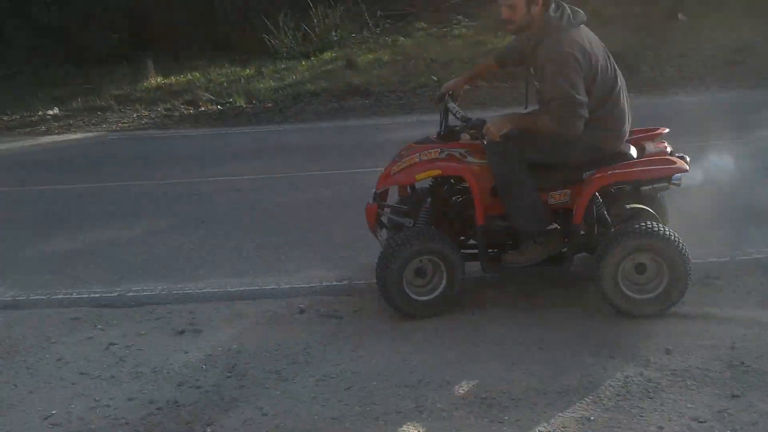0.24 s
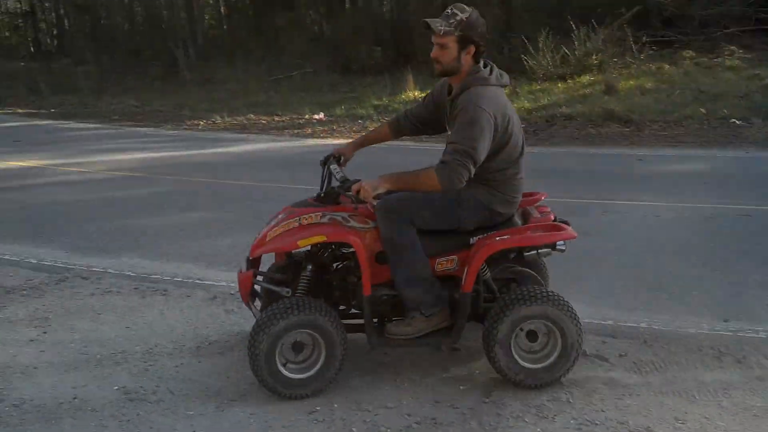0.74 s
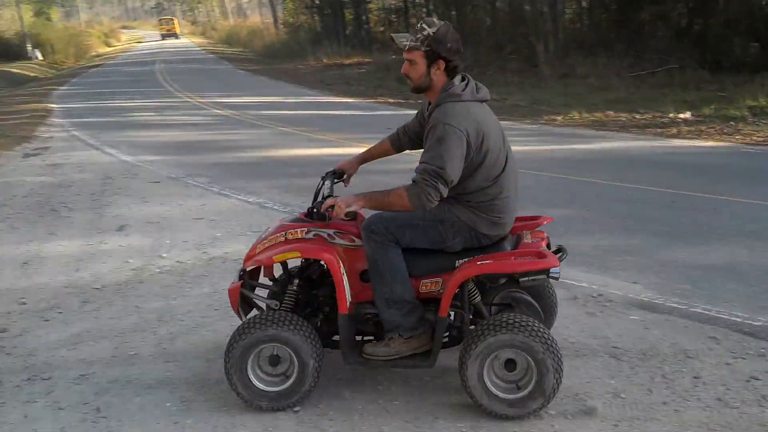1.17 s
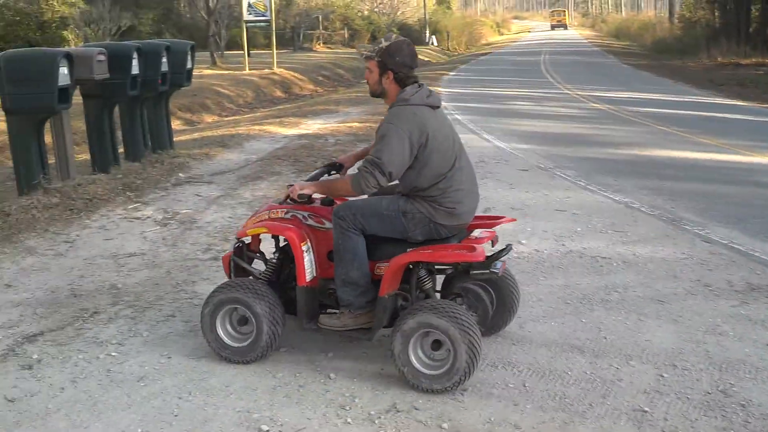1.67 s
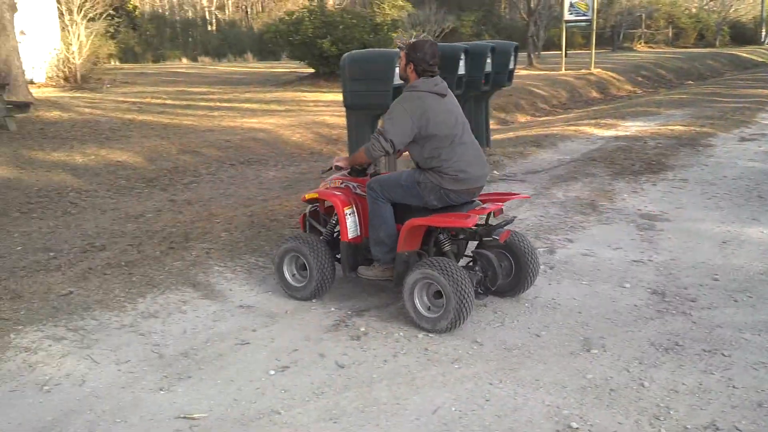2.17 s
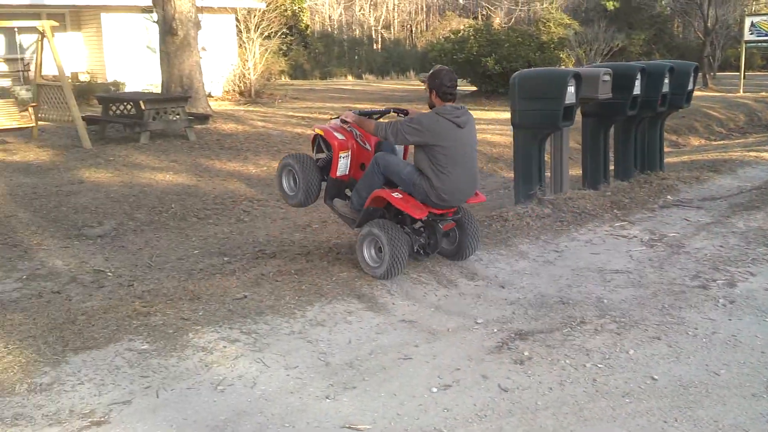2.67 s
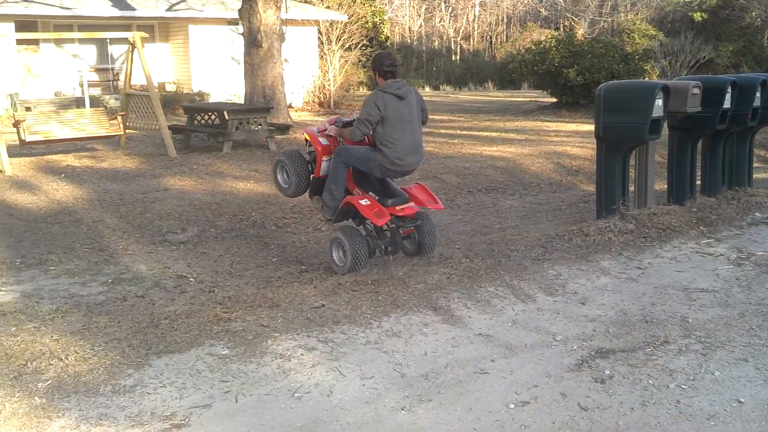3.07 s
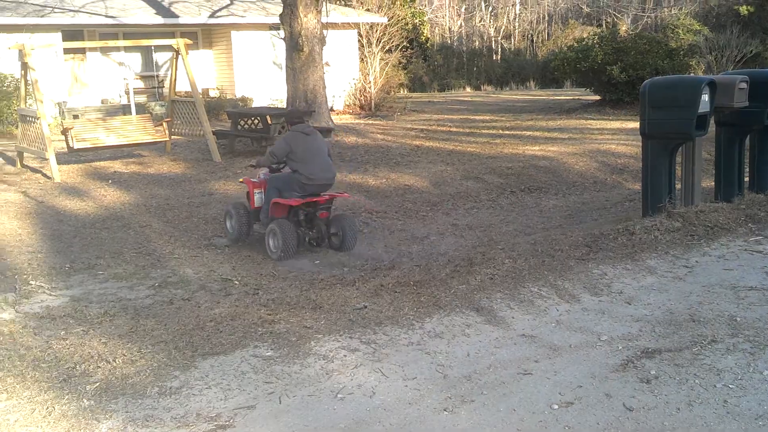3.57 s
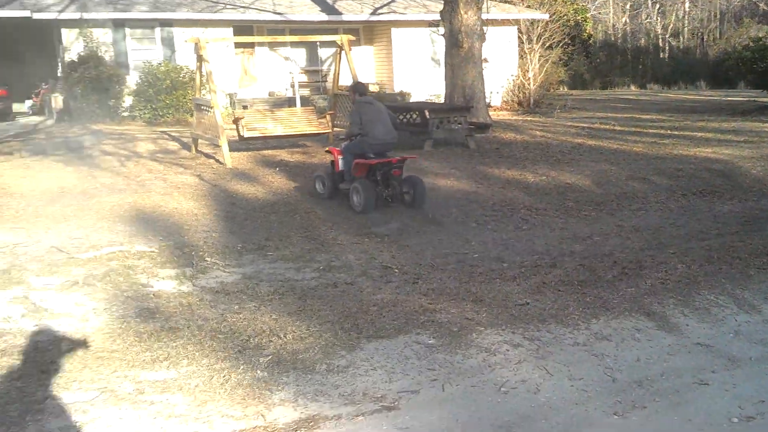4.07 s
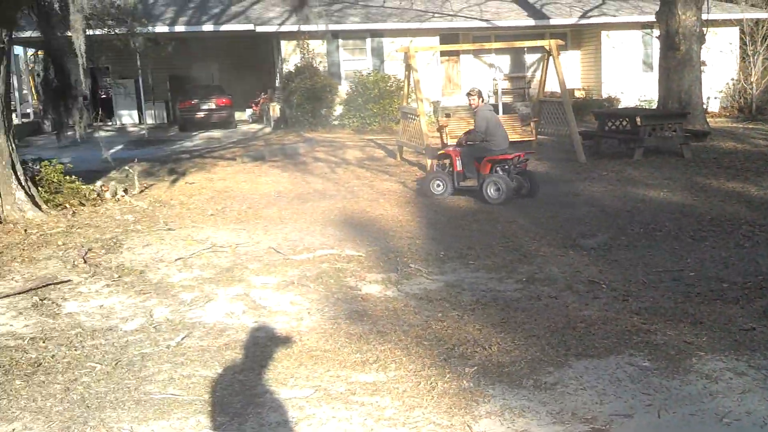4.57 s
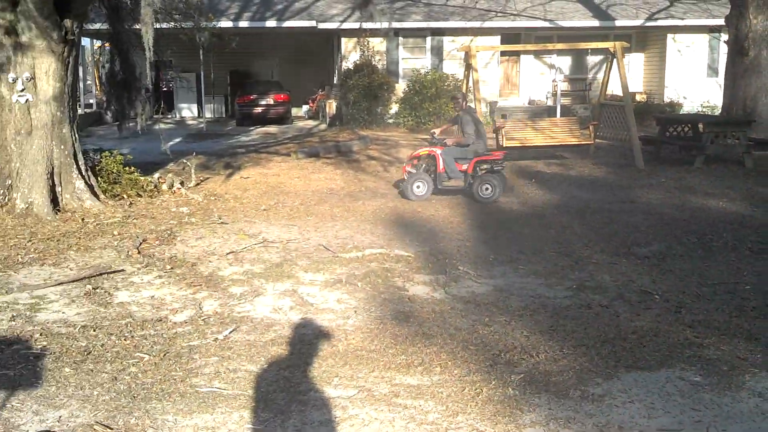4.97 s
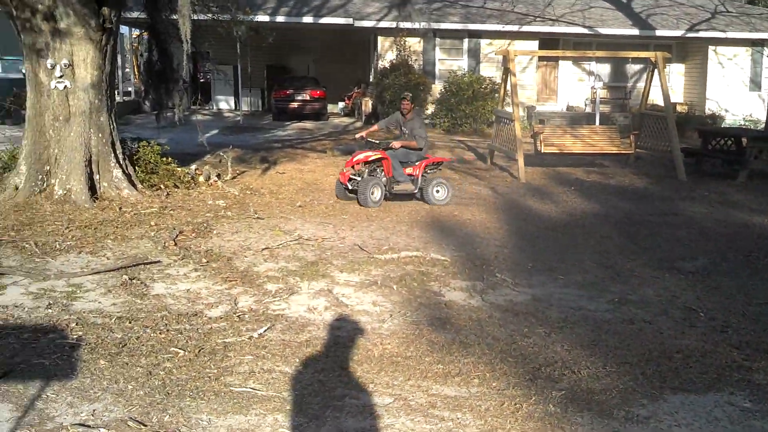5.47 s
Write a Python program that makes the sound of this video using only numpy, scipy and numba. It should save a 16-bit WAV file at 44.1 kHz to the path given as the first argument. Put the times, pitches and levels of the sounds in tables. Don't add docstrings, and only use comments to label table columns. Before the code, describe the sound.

Raspy little quad engine buzzes, sputters unevenly off throttle, and surges through repeated short pulls while gravel and chain rattle.

```python
import sys
import numpy as np
from scipy import signal
from scipy.fft import rfft, irfft, next_fast_len
from scipy.io import wavfile
from scipy.ndimage import uniform_filter1d
from numba import njit

SR = 44100
rng = np.random.default_rng(int(sys.argv[2]) if len(sys.argv) > 2 else 0)


def gain_from_db(level_db):
    decades = np.asarray(level_db, float) / 20
    return 10 ** decades


def materialize(psi):
    bounded = np.clip(np.atleast_2d(psi).T, -1, 1)
    quanta = np.round(bounded * 32767).astype(np.int16)
    wavfile.write(sys.argv[1], SR, quanta)


N = 253134
TIME = np.arange(N) / SR

# start in seconds, end in seconds.
THROTTLE_OPEN = [
    (0, .86),
    (2.1452, 2.77),
    (3.051, 3.62),
    (4.7463, 5.245),
    (5.3323, 5.8),
]
# time in seconds, distance loss in dB, heading in degrees from nose-on,
# load 0-1, nearness 0-1.
RIDE_PATH = [(0.0, 1, 69, 0.69, 1.07), (0.4, 0.3, 72.5, 0.74, 0.86), (0.8, 0, 56, 1.05, 1),
             (1.05, 2.5, 99, 0.51, 1), (1.45, 2, 109, 0.48, 0.92), (1.85, 3.5, 96, 0.1, 0.56),
             (2.07, 2.5, 128, 0, 0.32), (2.27, -1.5, 171, 0.39, 0.87), (2.55, -3, 197, 1.14, 0.51),
             (2.87, -2.5, 130, 0.31, 0.38), (3.1, -3, 139, 0.35, 0.01), (3.5, -6.5, 183, 1.18, 0.28),
             (3.85, -1, 173, 0.82, 0.2), (4.3, -3.5, 128, 0.14, 0.15), (4.7, -4.5, 84, 0.36, 0),
             (4.95, -3.5, 81, 0.72, 0.19), (5.3, -4, 63, 0.7, 0.64), (5.74, -8, 32, 0.88, 0.32)]


def unit(x):
    return x / np.sqrt(np.mean(x ** 2))


def curves(table):
    s, *columns = np.transpose(table)
    return [np.interp(TIME, s, c) for c in columns]


def ride(rules):
    loss_db, heading, load, near = curves(RIDE_PATH)
    angle = np.radians(heading)
    return np.array(rules) @ [1 + 0 * TIME, np.cos(angle), np.sin(angle), load, near], loss_db


@njit
def svf(x, hz, width):
    y = np.empty(len(x))
    band, low, last, g, k = 0., 0., 0., 0., 0.
    for i in range(len(x)):
        if hz[i] != last:
            last = hz[i]
            g = np.tan(np.pi * hz[i] / SR)
            k = width / hz[i]
        v = (band + g * (x[i] - low)) / (1 + g * (g + k))
        band = 2 * v - band
        low = low + 2 * g * v
        y[i] = k * v
    return y


def steep_band(x, hz, width):
    centre = hz + 0 * TIME
    return svf(svf(x, centre, 1. * width), centre, 1. * width)


def ring(x, modes):
    return sum((-1) ** k * gain_from_db(db) * steep_band(x, hz, width) for k, (hz, width, db) in enumerate(modes))


def colour(x, points):
    hz, db = np.transpose(points)
    f = np.fft.rfftfreq(N, 1 / SR) + 1
    return irfft(rfft(x) * gain_from_db(np.interp(np.log(f), np.log(hz), db)), N)


def clicks(at, size):
    place = at.astype(int)[:, None] + np.arange(-8, 9)
    gap = place - at[:, None]
    pulse = np.sinc(gap) * np.cos(np.pi * gap / 18) ** 2
    out = np.zeros(N)
    np.add.at(out, np.clip(place, 0, N - 1), size[:, None] * pulse)
    return out


def speed(sag_s=0.3):
    # time in seconds, turns in Hz.
    pulls = [
        [(0.0, 100.9), (0.176, 101.5), (0.254, 102.6), (0.412, 102.9), (0.528, 101.6), (0.614, 102.9),
         (0.836, 109.7), (0.86, 109.7)],
        [(2.145, 84.27), (2.246, 92.4), (2.38, 104.8), (2.45, 109.5), (2.48, 109.7), (2.688, 105),
         (2.744, 104.8), (2.77, 104)],
        [(3.05, 89.25), (3.098, 91.2), (3.182, 98.5), (3.306, 104.7), (3.49, 107.9), (3.546, 106.6),
         (3.62, 106.4)],
        [(4.745, 83.8), (4.831, 88.25), (4.959, 94.4), (5.161, 99.7), (5.187, 99.1), (5.245, 95.4)],
        [(5.33, 94.4), (5.412, 98.74), (5.516, 101.4), (5.596, 99.6), (5.702, 94), (5.74, 90)],
    ]
    hz = curves(np.vstack(pulls))[0]
    for (_, shut), (opens, _) in zip(THROTTLE_OPEN, THROTTLE_OPEN[1:]):
        coast = (TIME > shut) & (TIME < opens)
        left = np.exp(-(TIME[coast] - shut) / sag_s)
        start, end = hz[coast][[0, -1]]
        sag = end + (start - end) * (left - left[-1]) / (1 - left[-1])
        hz = np.where(coast, np.interp(TIME, TIME[coast], sag), hz)
    return uniform_filter1d(hz, size=2000)


def crank(miss_db=-7.0, fade_s=0.028, before_db=-7, first_db=-1.5, fourth_db=-1.5):
    # time in seconds, turn before in dB, first turn in dB,
    # second over first in dB, third turn in dB.
    shut_catches = [(0.9262, -11.5, -1, 1, .5), (1.0142, -3.5, .5, -0.5, -1), (1.109, -4, 0, -0.5, -9.5),
                    (1.1921, -3.5, 0, -2.5, -5), (1.2669, -8, -1, 1, -3.5), (1.3428, 2, 0, -2, -17),
                    (1.4307, -1, -0.5, 0, -15), (1.52, 5, 0, -.5, -11), (1.6216, 0, -0.5, -1, -9),
                    (1.7246, -3, -1, -1.5, -8), (1.8164, 4, 0, 0, -4), (1.9089, -4, -1.5, 1.5, -13.5),
                    (1.9911, -7, -1, 0.5, -2.5), (2.0738, -5, -.5, -0.5, -10), (2.8114, -5.5, 0.5, 1, 0),
                    (2.8922, -6.5, 0, 1, -0.5), (2.975, -7, 0, -0.5, -8), (3.684, -3.5, -0.5, 0.5, -.5),
                    (3.7807, -7.5, -0.5, 0.5, -2.5), (3.8609, -7, -3, 1.5, -3.5),
                    (3.944, -2, -0.5, -2.5, -7.5), (4.009, -13.5, -1, 0.5, -3),
                    (4.1083, -10.5, 0, 0.5, -4.5), (4.2096, -4.5, -0.5, 1, -5.5), (4.3014, 3.5, 0.5, 0, -5),
                    (4.3936, -2, 0, 1, -10), (4.4864, -5.5, 0, 0, -6), (4.5803, -7, 0, 0.5, -10.5),
                    (4.6749, -4.5, 0.5, -2, -15.5), (5.2797, -17, 0, 0, -0.5)]
    pull_catches = [(start, before_db, first_db, -first_db, 0) for start, _ in THROTTLE_OPEN[1:]]
    catch = np.array(sorted([tuple(row) for row in shut_catches] + pull_catches))

    turns = np.cumsum(speed()) / SR
    at_catch = np.interp(catch[:, 0], TIME, turns)
    whole = np.cumsum(np.round(np.diff(at_catch, prepend=0)))
    turns = turns + np.interp(TIME, np.r_[0, catch[:, 0]], np.r_[0, whole - at_catch])
    s = np.interp(np.arange(int(turns[-1])), turns, TIME)

    held = np.max([(s > a) * np.clip(1 + (b - s) / fade_s, 0, 1) for a, b in THROTTLE_OPEN], axis=0)
    db = miss_db * (1 - held)
    _, before, first, second, third = catch.T
    fourth = np.maximum(third + fourth_db, miss_db) * (third != 0)
    burn = [np.minimum(before, -3.2), first, first + second, third, fourth]
    db[whole.astype(int)[:, None] + np.arange(5) - 1] = np.transpose(burn)
    return turns, s, np.minimum(db, 2.5)


def engine(turns, s, db, puff=.6, lead_db=-4, churn=.6):
    # centre in Hz, width in Hz, level in dB.
    can, rasp, high_rasp = [(1563, 72, 0)], [(2950, 160, -17), (3222, 180, -1.5), (3430, 190, -2.5)], [(3657, 180, 5), (3956, 98, -5), (4376, 81, -4.5)]
    jet = [(4850, 220, -2), (5450, 260, 2), (6700, 500, 0), (7450, 350, -6)]
    # centre in Hz, width in Hz, level in dB.
    neck = [(1853, 147, 0.98), (2417, 950, 3.6)]
    # level in dB, then dB gained nose-on, side-on, under load, near.
    facing = [
        (-26, -5, -5, -5.5, -4.5),
        (-30.5, -3, -2, -1.5, 0),
        (-34, -1.5, -1.5, 6.5, -13.5),
        (-41, -2.5, -8, 8, -4),
        (-17.5, 2.5, -5, -4, -0.5),
        (-9, 5, -5, 1, -11.5),
        (-41.5, -7.5, 19.5, 14, 0.5),
        (-24, -0.15, -1.6, -7.5, 8),
        (-29.5, -1, -4, -0.5, 0),
    ]
    # pitch in Hz, then Hz shifted nose-on, side-on, under load, near.
    drift = [
        (154, 24, 19, -47, -8),
        (366, 21.5, -39.5, 39.5, -81),
        (613, -20, -15, 120, 12),
        (1089, 20, -1, 88.5, -73),
    ]
    # time in seconds, swing -1 to 1.
    outlet_swing = [(0, 0.31), (.5, 0.17), (1, 0.47), (1.6, 0.44), (2.1, 0.37), (2.35, 0.25), (2.7, 0.61),
                    (3.1, 0.2), (3.5, 0.15), (4, 0.37), (4.5, 0.22), (4.75, 0.78), (5.15, 0.74),
                    (5.35, 0.41), (5.55, 0.43), (5.74, -0.21)]
    swing_db = [-4.5, -3, -6.5, -9.5, 4.5, 0, -12, -1, -0.5]
    swing_hz = [3, 244, 8.8, 11]

    jitter_s, scatter_db = .00001, .7
    chance = rng.standard_normal((700, 5))[:len(s)]
    uneven = np.clip(1 - (db + 3) / 3.5, 1, 2.5)
    far = np.clip(1.2 - 1.5 * curves(RIDE_PATH)[3], 0, 1)
    strike = unit(clicks((s + jitter_s * uneven ** 3 * chance[:, 0]) * SR, np.ones(len(s))))
    gas = unit(np.exp(-(turns % 1) / puff) * rng.standard_normal(N))
    turn = np.clip((turns + .1).astype(int), 0, len(s) - 1)
    soft = lead_db * (np.roll(db, -1) > db + 2.2)
    lit = (np.clip(1 + (db + 2.5) / 3, 0, 1) * np.where(soft < 0, .12, 1))[turn]

    def part(filt, steep, rough, column, crack=0):
        size = (steep * db + crack * soft + scatter_db * uneven * chance[:, column])[turn]
        blow = strike * gain_from_db(size)
        blow = lit * blow + sweep((1 - lit) * blow)
        close_blow = chambers((1 - far) * blow, .84 + .12 * crack)
        blow = close_blow + chambers(far * blow, .93 + .04 * crack)
        hiss = rough * gas * gain_from_db(churn * uniform_filter1d(size, size=90))
        return filt(blow + hiss) / np.std(filt(strike + rough * gas))

    swing = curves(outlet_swing)[0]
    thud_hz, boom_hz, low_hz, high_hz = ride(drift)[0] + np.outer(swing_hz, swing)
    rough_low, rough_can, rough_rasp, rough_jet = .07, .09, .055, .17
    parts = [part(lambda x: ring(x, can), 2.56, rough_can, column=2, crack=0.53),
             part(lambda x: ring(x, rasp), 5.6, rough_rasp, column=3, crack=0.7),
             part(lambda x: ring(x, high_rasp), 3.6, rough_rasp, column=4, crack=0.87),
             part(lambda x: ring(x, jet), 3.5, rough_jet, column=4, crack=1),
             part(lambda x: steep_band(x, thud_hz, 404), 1.04, rough_low, column=1),
             part(lambda x: -steep_band(x, boom_hz, 290), .85, rough_low, column=1),
             part(lambda x: steep_band(x, low_hz, 200), 1.1, rough_low, column=0),
             part(lambda x: -steep_band(x, high_hz, 225), 1.96, rough_low, column=2),
             part(lambda x: -ring(x, neck), 4.1, rough_rasp, column=2, crack=0.74)]
    levels, loss_db = ride(facing)
    levels = levels + glints() + np.outer(swing_db, swing)
    return sum(gain_from_db(level + loss_db) * p for level, p in zip(levels, parts))


def chambers(x, share, back_s=.0038):
    gap = np.zeros(int(back_s * SR))
    return signal.lfilter(np.r_[share, gap, 1], np.r_[1, gap, share], x)


def sweep(x, spread_s=.007, top_hz=1400):
    size = next_fast_len(N, True)
    delay = spread_s * np.minimum(np.fft.rfftfreq(size, 1 / SR) / top_hz, 1)
    phase = 2 * np.pi * np.cumsum(delay) * SR / size
    return irfft(rfft(x, size) * np.exp(-1j * phase), size)[:N]


def glints():
    # time in seconds, length in seconds, gain in dB.
    swells = [(2.74, 0.14, 9), (5.15, 0.096, 13.5), (8, 0.33, 13.5), (3.22, 0.52, 6.5), (2.25, 0.031, 2.5),
              (5.0, 0.14, 6), (0.67, 0.12, 7), (2.314, 0.056, 4.5), (5.4, 0.09, -1.5), (3.46, 0.19, 7),
              (2.27, 0.048, 5), (4.79, 0.34, 6.5), (0.79, 0.048, 4), (0.71, 0.084, 10.5), (0.63, 0.15, 3.5),
              (4.6, 0.11, 2), (6.3, 0.04, 2), (2.03, 0.33, 7), (2.62, 0.071, 6.5), (4.5, 0.044, 2)]
    bodies = [0, 0, 0, 2, 1, 1, 7, 7, 7, 4, 5, 4, 1, 2, 5, 5, 7, 2, 2, 5]
    out = np.zeros((9, N))
    for body, (s, length, db) in zip(bodies, swells):
        out[body] += db * np.exp(-((TIME - s) / length) ** 2)
    return out


def sing(turns, s, burn_db, duck=.7):
    multiples = [7, 11]
    # level in dB, then dB gained nose-on, side-on, under load, near.
    tone_db = [(-44, 15, 9.5, 0, 11.4), (-36.5, -2.5, 1.7, -1.1, 9.1)]
    levels, loss_db = ride(tone_db)
    sink_db = duck * np.interp(TIME, s, uniform_filter1d(burn_db, size=3))
    return sum(gain_from_db(db + loss_db + sink_db) * np.sin(2 * np.pi * k * turns) for k, db in zip(multiples, levels))


def gear(turns, stones=900, stone_db=-6.0, flutter_db=2.2):
    # level in dB, then dB gained nose-on, side-on, under load, near.
    running = [
        (-40, 4.5, -5.5, 6, 4.5),
        (-59, -1, -1.3, 7.3, 0.5),
        (-51, 11.5, -7.5, 8, 9.5),
    ]
    # frequency in Hz, level in dB.
    roar_colour = [(30, -32), (60, -9.5), (100, -3), (250, 0), (700, -11), (1100, -12), (1500, -15),
                   (2700, -20), (3600, -29.5), (5000, -25.5), (7500, -38.5), (10000, -53), (15500, -62)]
    # time in seconds, pitch in Hz, level in dB.
    frame_stone = (2.009, 14500, -41)

    levels, loss_db = ride(running)
    clatter_db, grit_db, whine_db = levels + loss_db
    flutter = unit(uniform_filter1d(uniform_filter1d(rng.standard_normal(N), size=1500), size=1500))
    roar_db = -28 + 0.016 * loss_db + flutter_db * flutter
    roar = unit(colour(rng.standard_normal(N), roar_colour)) * gain_from_db(roar_db)
    clatter_modes = [(1850, 2800, 2.5), (3900, 2060, -4.0), (5220, 560, 3.0)]
    clatter = unit(ring(rng.standard_normal(N), clatter_modes)) * gain_from_db(clatter_db)
    whine = gain_from_db(whine_db + 3.5 * flutter) * np.sin(2 * np.pi * 19 * turns)

    ticks = (rng.random(N) < stones / SR) * gain_from_db(stone_db * rng.exponential(size=N))
    ticks = ticks + .5 * rng.standard_normal(N)
    grit = gain_from_db(grit_db) * unit(ring(ticks, [(8030, 8700, -11.0), (10900, 2400, -20.5)]))
    s, hz, db = frame_stone
    stone = 10 * gain_from_db(db) * steep_band(clicks(np.array([s * SR]), np.ones(1)), hz, 2500)
    return roar + clatter + whine + stone + grit


def squeak():
    # time in seconds, length in seconds, pitch in Hz, level in dB.
    brake = (1.32, .03, 4650, -40)
    s, length, hz, db = brake
    return gain_from_db(db) * unit(ring(rng.standard_normal(N), [(hz, 90, 0)])) * np.exp(-((TIME - s) / length) ** 2)


def shade(x):
    # time in seconds, half length in seconds, centre in
    # Hz, width in Hz, gain in dB.
    shadings = [(.2, 0.49, 3200, 297, -5), (0.304, 0.13, 1030, 80.5, -4), (.35, 0.26, 1376, 100, 9),
                (.9, 0.24, 3620, 150, -16), (0.937, 0.11, 764, 98, -10), (1.45, 0.24, 1850, 148, 6),
                (2.003, 0.23, 2320, 203, 5), (2.052, 0.38, 3620, 120, 3), (2.247, 0.098, 3470, 150, 5.5),
                (2.3, 0.22, 2630, 300, -22), (2.4, 0.27, 1110, 150, -8.5), (2.47, 0.11, 310, 98, 5),
                (2.457, 0.041, 2850, 150, 8.5), (2.45, 0.31, 2080, 151, 7), (2.55, 0.17, 823, 119, 10.5),
                (2.55, 0.29, 4490, 100, 6), (2.7, 0.11, 2314, 497, -4.5), (3.0, 0.9, 3590, 80.5, -6.5),
                (3.103, 0.31, 3290, 148, -10), (3.145, 0.12, 373, 120, 3), (3.298, 1, 2990, 148, 8.5),
                (3.406, 0.12, 1720, 100, 8.5), (3.506, 0.22, 3200, 121, 5.5), (3.5, 0.14, 2500, 100, 4),
                (4.207, 0.4, 1059, 117, -20), (4.3, 0.32, 2390, 400, -7), (4.296, 0.12, 3140, 300, 7.5),
                (4.407, 0.23, 1890, 99, 6), (4.395, 0.25, 1140, 121, 7), (4.7, 0.27, 2300, 199, 5),
                (4.7, 0.45, 4340, 400, -10), (5.1, 0.074, 2650, 121, 11), (5.11, 0.084, 1100, 119, 5.5),
                (5.3, 0.38, 2530, 200, -13), (5.355, 0.064, 1220, 150, 8.5), (5.5, 0.15, 1900, 96, 9),
                (5.61, 0.081, 3900, 297, 3.5), (5.7, 0.15, 1160, 150, 5.5), (3.5, .2, 203, 79.6, -9),
                (5.4, .15, 190, 80, 7)]
    # time in seconds, half
    # length in seconds, centre in Hz, width in Hz, gain in dB.
    more_shadings = [(3.9, 1.2, 2670, 83, -8), (1.6, 1.2, 3200, 110, 7.5), (5.24, 0.36, 3130, 160, 3),
                     (0.29, .3, 2640, 160, -10), (5.0, 1.6, 3200, 95, -10), (0.64, .5, 523, 53, -10),
                     (1, 0.1, 84, 48, -6.5), (2.2, 0.12, 85, 49, -7), (3.03, 0.24, 71, 54, -5),
                     (3.3, .07, 92, 60, -7), (4, 0.099, 75, 51, -1.5), (2.47, 0.11, 83, 75, 6.5),
                     (0.74, 0.3, 1710, 125, 8.5), (2.49, 0.24, 1670, 72, 11.5), (2.6, 0.18, 1360, 84, 7.5),
                     (3.7, 0.53, 1416, 64, 7), (4.75, 0.17, 770, 110, 8), (5.04, 0.35, 820, 56, 3.5),
                     (5.38, 0.038, 3830, 590, 6.5), (2.25, 0.14, 490, 163, 9.5), (4.42, 0.66, 430, 54, -17),
                     (2.05, 0.41, 427, 74, -18), (3.8, .25, 14600, 1000, 8), (5.4, .05, 6800, 3300, 2.5),
                     (3.28, 0.3, 1040, 150, -5.5), (1.5, 0.99, 4000, 130, 2)]
    # time in seconds, half length
    # in seconds, centre in Hz, width in Hz, gain in dB.
    further_shadings = [(4.89, 0.042, 1170, 110, 9), (5.43, .18, 1590, 82, 8), (4.95, 0.21, 3260, 180, 5.5),
                        (5.6, .1, 3350, 150, 4.5), (2.47, .05, 757, 80, -9), (2.18, 0.042, 810, 80, -6.5),
                        (2.38, .04, 1150, 100, 6.5), (2.45, .03, 1190, 90, -4), (3.5, .04, 1150, 100, -10),
                        (3.2, .08, 950, 91, 6.5), (1.3, 0.13, 670, 120, -5.5), (2.5, 0.37, 5600, 440, 5),
                        (2.8, 1.4, 7900, 600, 4.5), (2.92, .12, 85, 60, -6), (2.22, 0.11, 88, 50, 6.5),
                        (4.5, .3, 5400, 300, 4.5), (4.88, .15, 90, 60, -3.5), (1.9, .25, 3000, 120, -6),
                        (5.3, .4, 7900, 600, 4.5), (2.27, .05, 830, 87, 5), (2.53, .06, 4030, 120, 6),
                        (4.34, .3, 6800, 1200, -3.5), (1.3, 0.24, 240, 55, 4.5), (3.6, 0.13, 78, 50, 6.5)]
    x = x.copy()
    for s, half, hz, width, db in list(shadings) + list(more_shadings) + list(further_shadings):
        span = np.abs(TIME - s) < 2 * abs(half) + .02
        lift = gain_from_db(db * np.exp(-((TIME[span] - s) / half) ** 4)) - 1
        x[span] += lift * svf(x[span], hz + 0 * lift, 1. * width)
    return x


def yard(x, t60=0.13, wet_db=-18):
    t = TIME[:SR // 2]
    tail = rng.standard_normal(len(t)) * np.exp(-np.log(1000) * t / t60) * (t > .012)
    echo = unit(tail) * gain_from_db(wet_db) / np.sqrt(len(t))
    return x + signal.fftconvolve(x, echo)[:N]


def scene():
    turns, s, db = crank()
    motor = yard(engine(turns, s, db) + sing(turns, s, db))
    mix = shade(motor + gear(turns)) + squeak()
    return np.tile(mix, (2, 1))


def band_limit(x):
    return signal.sosfilt(signal.butter(12, 16390, fs=SR, output="sos"), x)


def record(dry):
    # frequency in Hz, gain in dB, lag in half turns.
    spread = [(0, -4, 0), (1500, -2.4, 1.07), (2650, 0, 2), (2800, 0, 2), (3900, 4.8, 2.98), (4850, 0, 4),
              (5050, 0, 4), (6500, -4, 5.2), (8300, -4.5, 6.4), (9000, -2, 7), (9600, -1.5, 7.55),
              (9980, 0, 8), (10520, 0, 8), (10950, -2.5, 8.5), (12200, -5.5, 9.3), (13200, -5, 10),
              (14500, -3, 11), (15500, -3, 11.6)]
    bass_cut = signal.butter(3, 75, "high", fs=SR, output="sos")
    top_cut = signal.ellip(8, .2, 70, 15350, fs=SR, output="sos")
    right = signal.sosfilt(bass_cut, np.tanh(dry[1] / 1.3) * 1.3)
    right = signal.sosfilt(top_cut, right)

    hz, db, lag = np.transpose(spread)
    f = np.fft.rfftfreq(N, 1 / SR)
    turned = np.exp(-1j * np.pi * np.interp(f, hz, lag))
    left = irfft(-rfft(right) * gain_from_db(np.interp(f, hz, db)) * turned, N)

    own_colour = [(12, -12), (25, -4), (45, 1), (75, -4), (300, -40), (6000, -30), (15200, -38), (15500, -90)]
    own = [gain_from_db(-64) * unit(colour(rng.standard_normal(N), own_colour)) for _ in "lr"]
    return band_limit(np.array([left, right]) + own)


dry = scene()
out = record(dry)
materialize(out)
```